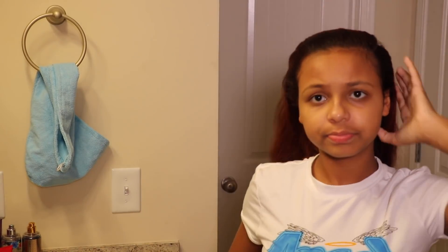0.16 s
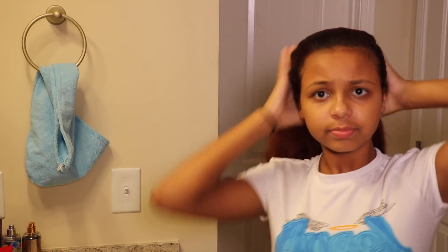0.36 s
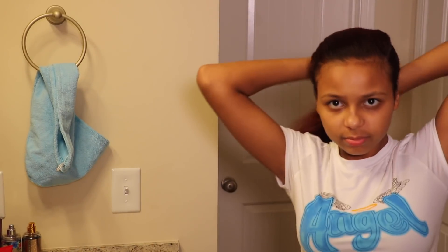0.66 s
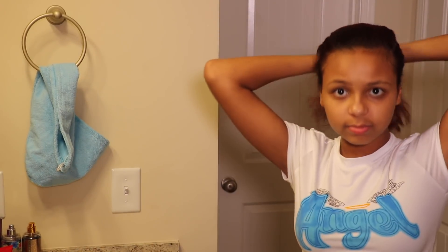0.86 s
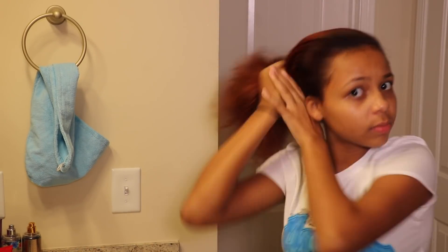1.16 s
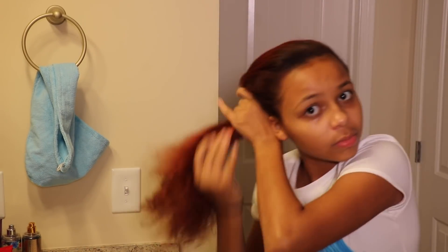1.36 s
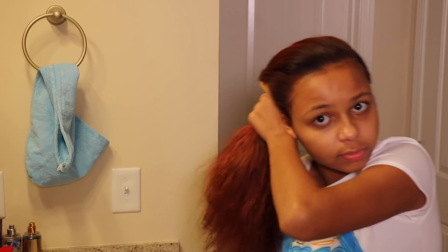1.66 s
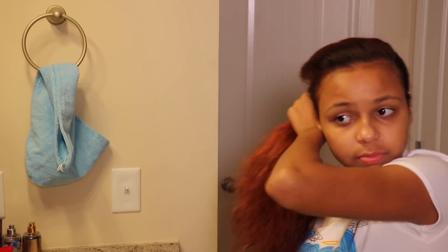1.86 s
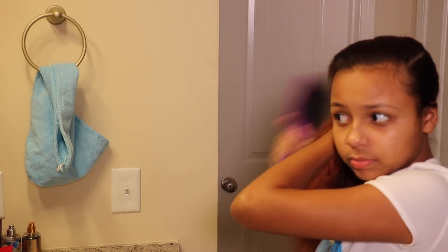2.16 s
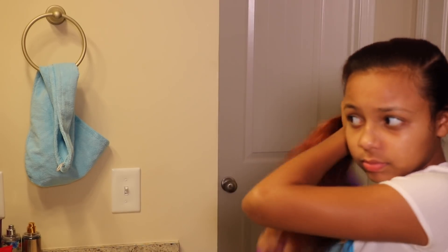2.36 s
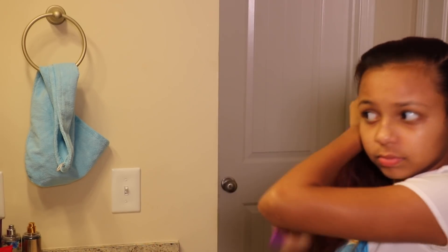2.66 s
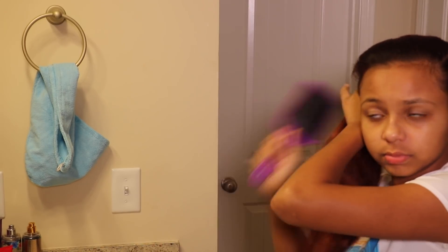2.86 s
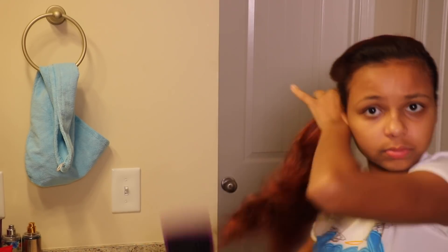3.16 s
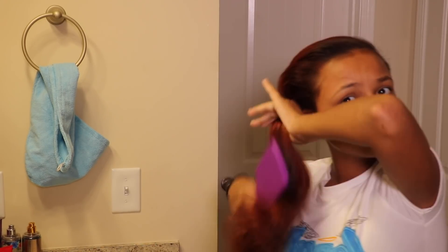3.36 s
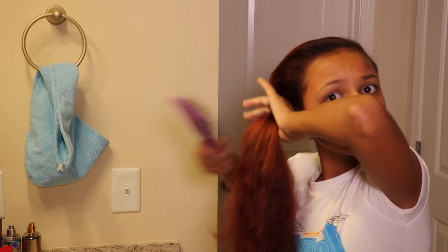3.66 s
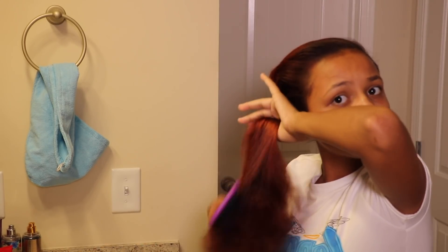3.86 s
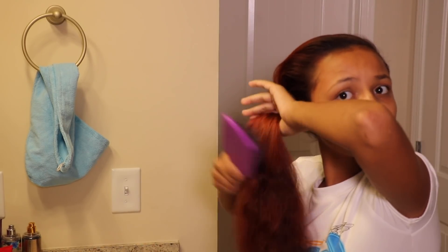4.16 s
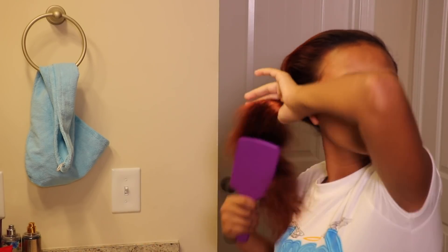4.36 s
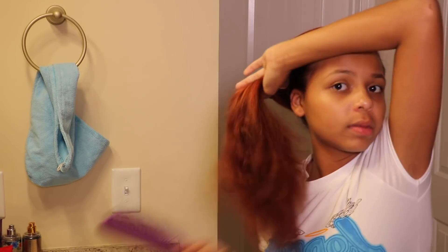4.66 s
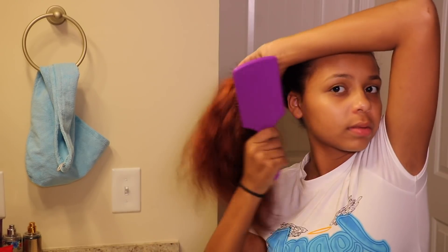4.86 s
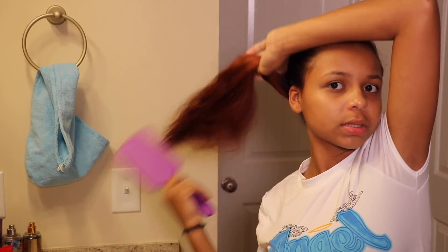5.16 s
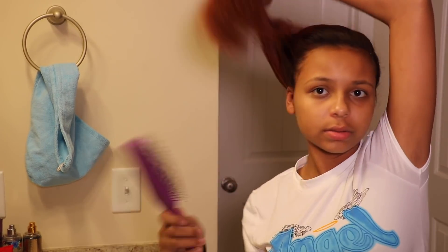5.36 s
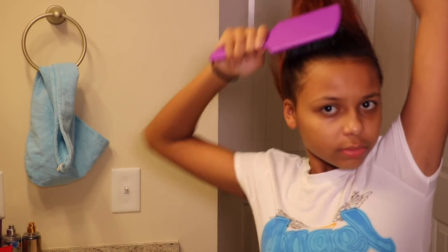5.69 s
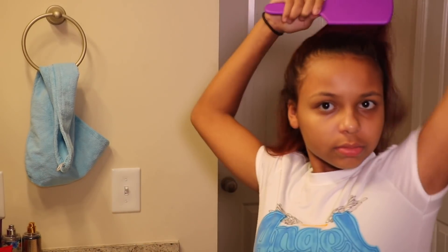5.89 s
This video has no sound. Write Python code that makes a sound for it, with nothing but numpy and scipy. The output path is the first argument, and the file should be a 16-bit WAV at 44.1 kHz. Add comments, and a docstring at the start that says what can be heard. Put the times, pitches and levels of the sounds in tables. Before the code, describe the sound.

Close up in a small bathroom, a paddle brush swishes through long hair eight times, its bristles plucking at the strands and tapping on the hollow head. Before the brushing come loud knocks on the counter, a soft rustle of hands in hair, and a second clatter with a short slide as the brush is lifted. Ventilation rumbles faintly throughout.

```python
"""Brushing long hair in a bathroom

A small, hard-walled room, the microphone close by. Hard things knock on the counter as one is put
down, hair and sleeves rustle, and the paddle brush knocks and slides as it is picked up. In eight quick
strokes the bristles pluck through the strands and drum on the hollow paddle. Ventilation rumbles
faintly underneath, and the camera's limiter ducks the loud knocks."""
import sys
import numpy as np
from scipy import signal
from scipy.fft import rfft, irfft, next_fast_len
from scipy.io import wavfile
from scipy.ndimage import map_coordinates

SR = 44100
rng = np.random.default_rng(int(sys.argv[2]) if len(sys.argv) > 2 else 0)


def persist_wave(psi):
    """Save psi, clipped to +-1, as 16-bit WAV."""
    counts = np.round(np.clip(psi, -1, 1) * 32767).astype(np.int16)
    wavfile.write(sys.argv[1], SR, np.atleast_2d(counts).T)


N = 265910

# Hard things on the counter: t/s, level/dB, tilt/(dB/octave), contact/s, bass/dB, clack/dB, echo/dB
KNOCKS = [ (0.0405, -0.5, 0, 0.0027, 6, 0, 3.5), (0.076, -6, -4.5, 0.0024, -28, 3, -6),
          (0.150, 0, -0.5, 0.0059, 4, 2.5, 1), (0.2126, 4, 3, 0.0021, 3, -0.5, 6),
          (1.5804, -27, 1.1, 0.0063, 2, 3.5, 2.5), (1.849, -11, -5.5, 0.018, -5, -5, -1.5),
          (1.871, -6.5, -0.95, .003, 1, 4.5, -0.5), (1.928, -22, -0.5, 0.005, 1.5, 0, 6)]
# Rubs and rustles of hands in the hair, sleeves, and the brush sliding on the counter as it is picked up:
# t/s, length/s, then relative levels: rub/dB, slide/dB, fizz/dB
HANDLING_RUBS = [ (0.5, 0.76, -58, -61.5, -71.5), (0.77, 0.18, -71.5, -65, -84),
                 (0.954, 0.024, -45.5, -58.5, -80), (1.044, 0.1, -58.5, -80.5, -89.5),
                 (1.208, 0.015, -82, -65, -72), (1.37, 0.092, -66, -54, -72),
                 (1.42, 0.025, -61, -70.5, -57), (1.6, 0.12, -46, -54, -65), (1.73, 0.0075, -38, -65, -76),
                 (1.786, 0.036, -31, -51, -55.5), (1.93, 0.061, -30.5, -52.5, -56),
                 (2.004, 0.024, -56, -41, -67), (5.29, 0.35, -63, -66.5, -72)]
# Dull bumps of the arms: t/s, level/dB, half-length/s, f/Hz
ARM_BUMPS = [ (0.655, -47, 0.05, 137), (0.67, -55.5, 0.048, 345), (4.764, -49, 0.013, 350),
             (5.429, -57, 0.03, 423), (5.663, -45, 0.032, 117)]
# Light taps of hand and brush: t/s, level/dB, tilt/(dB/octave), contact/s, f/Hz
TAPS = [ (0.952, -30, -2.5, 0.005, 514), (1.66, -42, 0, 0.0032, 1210), (1.683, -36, 3, 0.0031, 1280),
        (1.811, -41, 2, 0.002, 372), (2.646, -27, -0.5, 0.005, 585), (2.726, -27, -3, 0.0036, 527),
        (3.15, -31, 1.5, 0.0035, 318), (3.356, -28.5, 5, 0.011, 750), (3.452, -20, -1.5, 0.013, 723),
        (3.474, -20.5, -3, 0.014, 748), (3.783, -28.5, 0.5, 0.004, 537), (3.887, -32, 4, 0.003, 320),
        (3.917, -28.5, -1.5, 0.0071, 806), (4.275, -32.5, -2, 0.005, 744), (4.5171, -23, 0.5, 0.0053, 954),
        (4.858, -41.5, 0.5, 0.004, 1420), (4.939, -29, 0, 0.0027, 378)]
# Brush strokes: t/s, glide/s, time in the tangled ends/s, pull gliding/dB, pull in the ends/dB,
# then against the pull: paddle/dB, cushion/dB, fizz/dB; last, pitch factor of the gripped head
STROKES = [ (2.266, 0.086, 0.11, -52, -43.5, 7.8, -10, -11.5, 1.045),
           (2.64, 0.058, 0.052, -47.5, -41.5, 7.1, -8, -10.5, 1.01),
           (2.955, 0.088, 0.11, -50.5, -44.5, 8, -8.5, -11, 1.026),
           (3.354, 0.099, 0.03, -49.5, -41, 5, -4, -10.5, 1.115),
           (3.752, 0.12, 0.063, -51.5, -44.5, 7.1, -0.5, -7, 1.09),
           (4.274, 0.19, 0.056, -51.5, -48.5, 4.1, -6, -8, 1.133),
           (4.923, 0.16, 0.1, -55.5, -55.5, 4.8, -4, -6, 1),
           (5.70, 0.25, 0.07, -58.5, -56, 4.7, -6, -8, 1.02)]
# Bristles scraping the scalp once: t/s, length/s, level/dB
SCALP_SCRAPE = (5.755, 0.045, -36.5)
# A faint hum in the house: f/Hz, level/dB
HUM = [(86, -66), (119.8, -64.5)]
# Reverberation of the bathroom: f/Hz, time to fall 60 dB/s
WALL_DECAY = [(150, 0.23), (400, 0.3), (1000, 0.38), (2700, 0.29), (5000, 0.31), (8000, 0.27),
              (15000, 0.23)]

# Modes of the struck bodies: f/Hz, width/Hz, relative level/dB
COUNTER_MODES = [(285, 49, -3), (347, 35, -8), (576, 38, 0.5), (682, 44, 5), (905, 79, -3.5),
                 (1288, 66, -5.5), (2023, 110, -12.5), (2294, 38, -14)]
PADDLE_MODES = [(477, 47, 2), (691, 99, 3), (802, 77, 1.5), (906, 410, -7.5)]  # the hollow brush head
CUSHION_MODES = [(245, 94, -3), (332, 30, 8)]  # the bristle pad

# Spectra at the microphone: f/Hz, relative level/dB
ROOM_TONE = [(12, -60), (20, -14), (113, -5), (142, -7), (172, -13), (222, -14), (347, -14), (607, -22),
             (678, -29), (873, -27), (2320, -28.5), (2530, -30.5), (3160, -31.5), (3530, -30.5),
             (16000, -36.5)]
COUNTER_TONE = [(30, -38), (90, -4), (170, -25), (235, -3), (280, 2), (440, -6), (690, -1), (1100, -12),
                (1600, -11), (2100, -6), (2700, -9), (4400, -7), (6500, -16.5), (11500, -24), (16000, -40)]
WALL_TONE = [(200, 0.5), (2000, 1.5), (4500, -4), (8000, -5.5), (16000, -12)]  # treble is lost on the way round the room
RUB_TONE = [(100, 2.5), (200, -5.5), (300, 11), (430, 2), (690, 8), (950, -3), (1250, -3), (1900, -4.5),
            (3000, -15.5), (6000, -35.5)]
SLIDE_TONE = [(1200, 5), (2500, 5.5), (4000, 7), (6000, -4), (9000, -11), (16000, -32.5)]  # the brighter rustle of sliding
FIZZ_TONE = [(3000, -13), (6000, 6), (7500, 2), (10000, 2.5), (12300, 1), (13200, -1), (16000, -6)]  # fine crackle, as of loose hair ends
TAP_TONE = [(80, -30), (200, -20), (320, 2.5), (500, 2.5), (800, -2.5), (1400, -7), (4000, -9.5),
            (7000, -25.5), (16000, -35.5)]
STRAND_TONE = [(500, -21), (1000, -2), (1400, -1), (2100, 0.5), (2700, -3.5), (3700, 3.5), (4400, -1.5),
               (5000, -7), (6500, -16.5), (9000, -15), (16000, -36)]  # hair plucked by bristles
SCALP_TONE = [(200, -24), (400, -2.5), (720, 9), (1000, -2), (1800, -0.5), (2600, -8), (4000, -11),
              (8000, -53)]


def amp(db):
    """Decibels to gain."""
    return 10 ** (np.asarray(db) / 20)


def unit(x):
    """x at rms 1."""
    return x / np.sqrt(np.mean(x ** 2) + 1e-20)


def along(points, hz):
    """A curve of (f/Hz, value) points, read on a log frequency axis."""
    freqs, values = np.transpose(points)
    return np.interp(np.log(hz + 1), np.log(freqs + 1), values)


def filtered(x, response):
    """x through a complex frequency response."""
    size = x.shape[-1]
    padded = 2 * next_fast_len(size // 2 + 4096)
    hz = np.fft.rfftfreq(padded, 1 / SR)
    return irfft(rfft(x, padded) * response(hz), padded)[..., :size]


def coloured(x, spectrum):
    """x shaped by a spectrum, at rms 1."""
    return unit(filtered(x, lambda hz: amp(along(spectrum, hz))))


def minimum_phase(db):
    """The causal response with these levels: nothing rings before the blow."""
    cepstrum = irfft(np.log(amp(db)))
    half = len(cepstrum) // 2
    cepstrum[1:half] *= 2
    cepstrum[half + 1:] = 0
    return np.exp(rfft(cepstrum))


def resonance(modes, hz):
    """The response of a body whose modes alternate in sign."""
    return sum((-1) ** k * amp(db) * 1j * hz * width / (centre ** 2 - hz ** 2 + 1j * hz * width)
               for k, (centre, width, db) in enumerate(modes))


def tilt_db(hz, tilt):
    """Harder contacts are brighter: a slope in dB per octave about 1 kHz."""
    return tilt * np.log2(np.maximum(hz, 250) / 1000)


def plucks(per_s, spread_db):
    """Tiny slips of uneven size at random moments, at rms 1."""
    hits = rng.random(N) < per_s / SR
    signs = rng.choice([-1, 1], N)
    sizes = amp(spread_db * np.clip(rng.standard_normal(N), -2, 2))
    return unit(hits * signs * sizes)


def swell(start, length, rise_db_per_s, fall_db_per_s):
    """A gain that rises until start, holds for a length and dies away."""
    t = np.arange(N) / SR - start
    return amp(-rise_db_per_s * np.maximum(0, -t) - fall_db_per_s * np.maximum(0, t - length))


def wobble(knots_per_s):
    """A smooth random curve."""
    knots = rng.standard_normal(int(N * knots_per_s / SR) + 4)
    return map_coordinates(knots, [np.arange(N) * knots_per_s / SR])


def room_tone():
    """The quiet room: low ventilation rumble, a faint hum and microphone hiss."""
    t = np.arange(N) / SR
    hum = sum(amp(db) * np.sqrt(2) * np.sin(2 * np.pi * (hz * t + rng.random())) for hz, db in HUM)
    return hum + amp(-53) * coloured(rng.standard_normal(N), ROOM_TONE)


def wall_echo():
    """The dense answer of close walls to one impulse, each band dying at its own rate."""
    hz, t, bands = signal.stft(rng.standard_normal(SR * 3 // 4), SR, nperseg=256)
    decay = amp(-60 * t / along(WALL_DECAY, hz)[:, None])
    tail = signal.istft(bands * decay, SR, nperseg=256)[1]
    tail = filtered(tail / np.linalg.norm(tail), lambda hz: amp(along(WALL_TONE, hz)))
    return np.pad(tail, (round(0.0028 * SR), 0))  # the first reflection travels about a metre further


def bathroom(direct, echo_db):
    """At the microphone: the direct sound plus the walls' answer."""
    return direct + amp(echo_db) * signal.fftconvolve(direct, wall_echo())[:len(direct)]


def add_blow(track, start, db, contact, tone_db, echo_db):
    """One blow: a brief chatter of contact and its echo, both coloured by the struck body."""
    def body(hz):
        return minimum_phase(tone_db(hz)) / np.sqrt(np.mean(amp(tone_db(hz)) ** 2))

    tail = wall_echo()
    t = np.arange(len(tail)) / SR
    chatter = rng.choice([-1, 1], len(t)) * np.exp(-(t / contact) ** 4)
    impact = chatter / np.linalg.norm(chatter) + amp(echo_db) * tail
    blow = filtered(impact, body) * np.sqrt(SR / 1000)  # level counts over a millisecond
    track[round(start * SR):][:len(t)] += amp(db) * blow


def counter_knocks(bass_hz=400, shell_hz=3300, shell_half_width_hz=400):
    """Broad thuds with the counter's modes standing out; weight adds bass, a plastic shell a clack."""
    track = np.zeros(N + SR)
    for start, db, tilt, contact, bass_db, clack_db, echo_db in KNOCKS:
        def tone_db(hz):
            counter = amp(along(COUNTER_TONE, hz)) + np.abs(resonance(COUNTER_MODES, hz))
            weight_db = bass_db / (1 + (hz / bass_hz) ** 4)
            shell_db = clack_db / (1 + ((hz - shell_hz) / shell_half_width_hz) ** 2)
            return 20 * np.log10(counter) + tilt_db(hz, tilt) + weight_db + shell_db

        add_blow(track, start, db, contact, tone_db, echo_db)
    return track[:N]


def handling_rubs():
    """Friction in tiny slips: hands in the hair, sleeves, and the brush sliding on the counter."""
    rub, slide, fizz = sum(
        amp(levels_db)[:, None] * swell(start, length, rise_db_per_s=422, fall_db_per_s=258)
        for start, length, *levels_db in HANDLING_RUBS)
    scuff = amp(-5.5) * coloured(plucks(per_s=1200, spread_db=4), RUB_TONE)
    rustle = coloured(plucks(per_s=3000, spread_db=4), SLIDE_TONE)
    crackle = coloured(plucks(per_s=3000, spread_db=4), FIZZ_TONE)
    return bathroom(rub * scuff + slide * rustle + fizz * crackle, echo_db=-12)


def arm_bumps(width_hz=70):
    """Moving arms make soft, low swells without an attack."""
    t = np.arange(N) / SR
    track = np.zeros(N)
    for peak, db, half_length, pitch_hz in ARM_BUMPS:
        mode = [(pitch_hz, width_hz, 0)]
        boom = unit(filtered(rng.standard_normal(N), lambda hz: resonance(mode, hz) ** 2))
        track += amp(db) * np.exp(-((t - peak) / half_length) ** 2) * boom
    return track


def brush_taps(ring_peak_db=13, ring_half_width_hz=65):
    """The brush is handled, lands on the hair, snags and slips free; each spot has its own pitch."""
    track = np.zeros(N + SR)
    for start, db, tilt, contact, pitch_hz in TAPS:
        def tone_db(hz):
            ring_db = ring_peak_db / (1 + ((hz - pitch_hz) / ring_half_width_hz) ** 2)
            return along(TAP_TONE, hz) + tilt_db(hz, tilt) + ring_db

        add_blow(track, start, db, contact, tone_db, echo_db=-4)
    return track[:N]


def brush_strokes(tangle_s=0.031, paddle_lag_s=0.019, hiss_db=1.5):
    """Bristles bite, glide, drag through the tangled ends and come free, shaking paddle and cushion."""
    t = np.arange(N) / SR
    flicks = plucks(per_s=900, spread_db=3.5)
    catch_db = 1.4 * wobble(knots_per_s=45)  # bristles catch and let go, so the pull is uneven
    paddle, tug, hiss, fizz = np.zeros((4, N))
    for start, glide, snag, glide_db, ends_db, paddle_db, cushion_db, fizz_db, grip in STROKES:
        length = glide + snag
        tangle = np.clip(1 + (t - start - glide) / tangle_s, 0, 1)  # gathers as the glide ends
        pull = amp(glide_db + (ends_db - glide_db) * tangle + catch_db)
        drag = pull * swell(start, length, rise_db_per_s=800, fall_db_per_s=245.5)
        # The paddle is slower to start and to stop.
        shake = pull * swell(start + paddle_lag_s, length - paddle_lag_s,
                             rise_db_per_s=480, fall_db_per_s=220)
        drumming = unit(filtered(flicks, lambda hz: resonance(PADDLE_MODES, hz / grip)))
        # Tangled ends drive the paddle less, but tug at the cushion and fizz more.
        paddle += shake * amp(paddle_db - 1.5 * tangle) * drumming
        tug += drag * amp(cushion_db + 4 * tangle)
        fizz += drag * amp(fizz_db + 2 * tangle)
        hiss += drag * amp(hiss_db)
    cushion = unit(filtered(plucks(per_s=440, spread_db=6.5), lambda hz: resonance(CUSHION_MODES, hz)))
    strands = coloured(plucks(per_s=5500, spread_db=2.5), STRAND_TONE)
    ends = coloured(plucks(per_s=9000, spread_db=3), FIZZ_TONE)
    direct = paddle + tug * cushion + hiss * strands + fizz * ends + scalp_scrape(strands, cushion)
    return bathroom(direct, echo_db=-12.5)


def scalp_scrape(strands, cushion):
    """In the last stroke the bristles rasp over the scalp, with strands and cushion underneath."""
    start, length, db = SCALP_SCRAPE
    scrape = amp(db) * swell(start, length, rise_db_per_s=262, fall_db_per_s=230)
    rasp = coloured(plucks(per_s=1500, spread_db=0.5), SCALP_TONE)
    return scrape * (rasp + amp(-12.5) * strands + amp(-11) * cushion)


def scene():
    """One microphone position: both channels hear the same room, and a faint hiss differs between them."""
    mono = counter_knocks() + brush_taps() + arm_bumps() + brush_strokes() + handling_rubs()
    return mono + room_tone() + amp(-68.5) * rng.standard_normal((2, N))


def limiter(x, threshold_db, release_db_per_s, attack_s):
    """The gain dives just after a peak and creeps back, holding a knock's echo level for a moment."""
    peak_db = 20 * np.log10(np.abs(x).max(axis=0) + 1e-9)
    over_db = np.maximum(0, peak_db - threshold_db)
    release_db = release_db_per_s * np.arange(N) / SR
    cut_db = np.maximum.accumulate(over_db + release_db) - release_db
    pole = np.exp(-1 / (attack_s * SR))
    return x * amp(-signal.lfilter([1 - pole], [1, -pole], cut_db))


def record(dry):
    """The camera limits, rounds off what overshoots and keeps nothing above its band limit."""
    band_limit_hz = 15900
    held = limiter(dry, threshold_db=-6.5, release_db_per_s=120, attack_s=0.0019)
    rounded = held / (1 + held ** 6) ** (1 / 6)
    return filtered(rounded, lambda hz: 1 / (1 + (hz / band_limit_hz) ** 160))


dry = scene()
out = record(dry)
persist_wave(out)
```